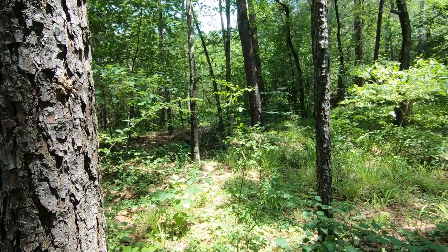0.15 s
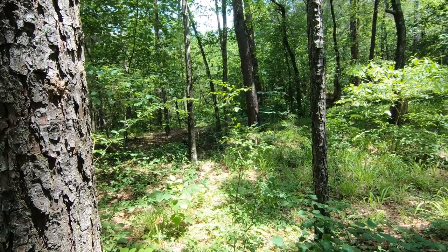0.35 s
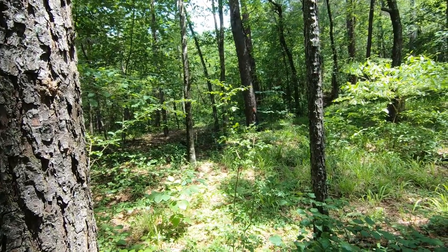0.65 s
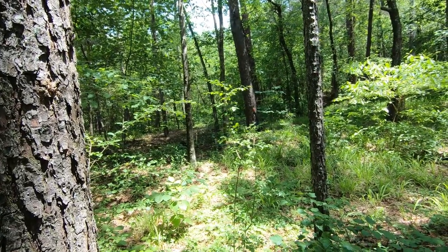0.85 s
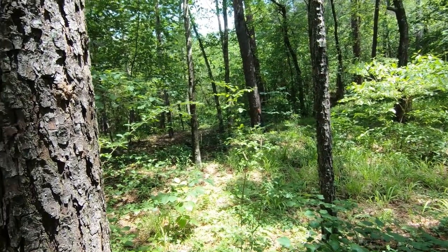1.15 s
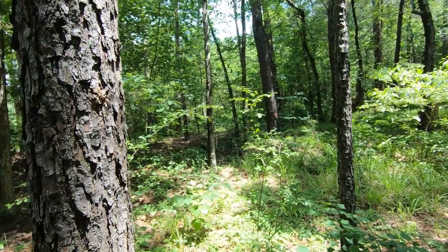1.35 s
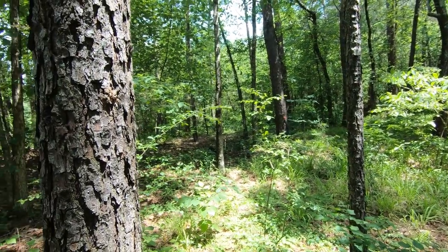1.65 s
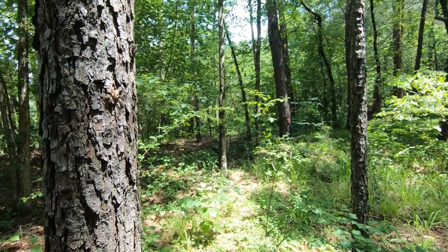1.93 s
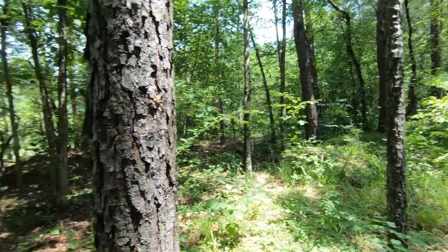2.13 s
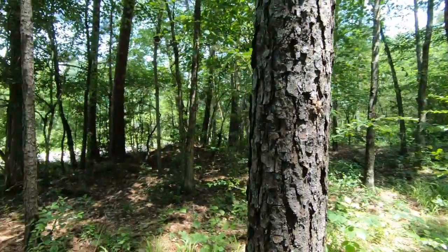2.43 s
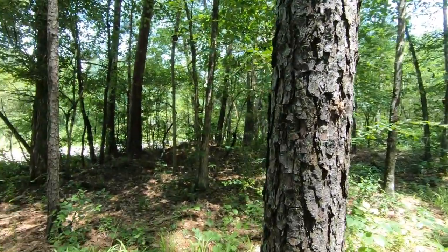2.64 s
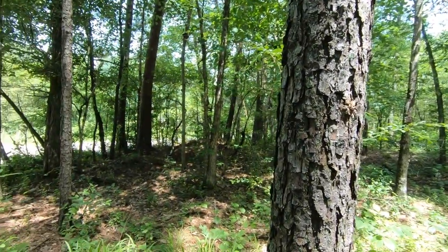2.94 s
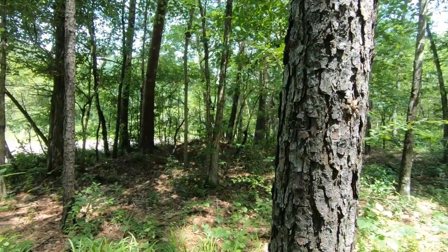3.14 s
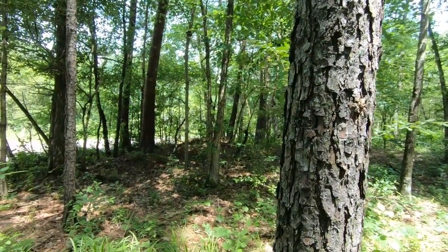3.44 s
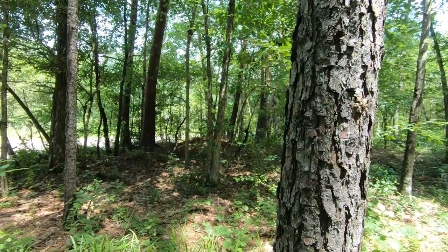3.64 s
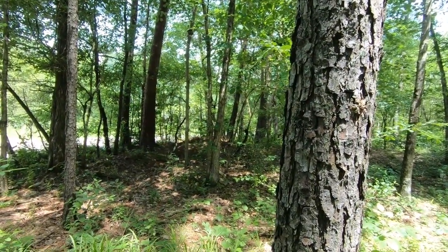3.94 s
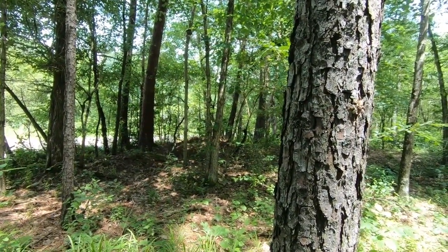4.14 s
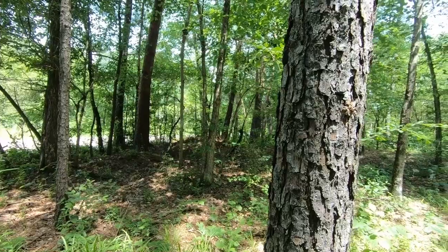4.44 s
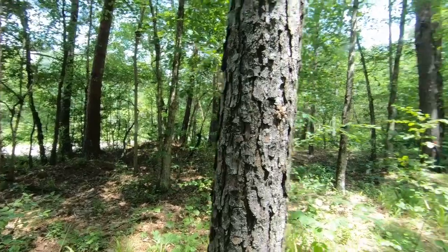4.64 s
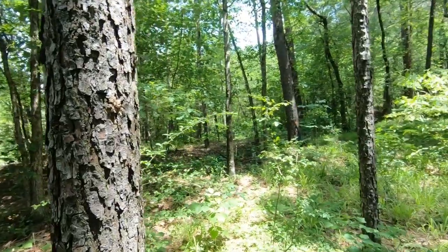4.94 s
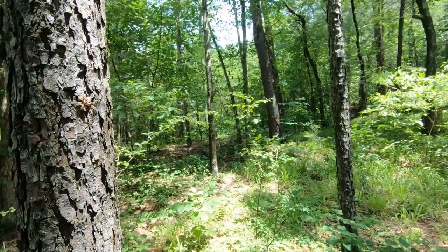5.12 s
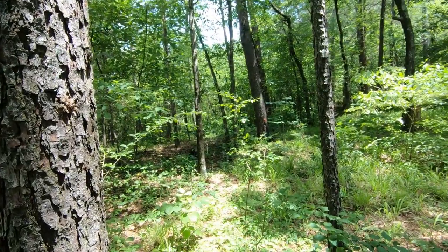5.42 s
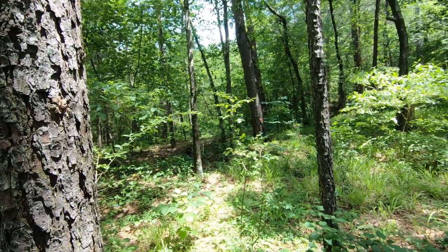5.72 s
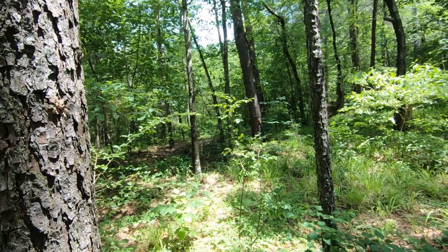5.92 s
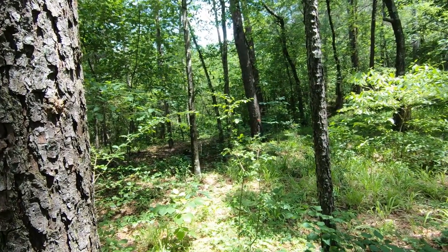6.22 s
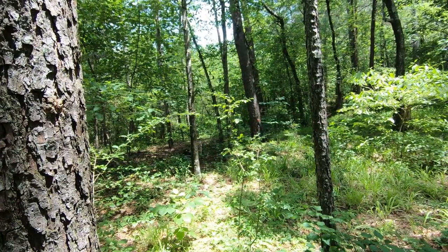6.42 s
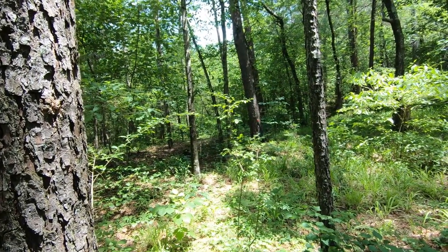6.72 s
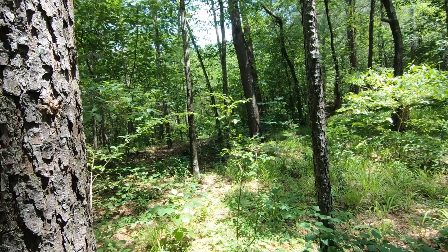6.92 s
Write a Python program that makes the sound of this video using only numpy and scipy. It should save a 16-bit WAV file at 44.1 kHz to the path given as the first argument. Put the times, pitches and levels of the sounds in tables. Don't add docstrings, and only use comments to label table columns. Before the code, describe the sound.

Dense woodland birdsong: short high whistles, quick slides and hoarse buzzes, softly echoed by trees over a hazy distant flock and faint machinery hum. Around one to two seconds cloth rubs against the hand-held microphone, then wind thumps heavily. More thumps and leaf brushing come near five seconds, followed by a nearer bird's rapid rising trill and a few lower, clear notes.

```python
import sys
import numpy as np
from scipy import signal
from scipy.fft import rfft, irfft, next_fast_len
from scipy.io import wavfile
from scipy.ndimage import uniform_filter1d

SR = 44100
rng = np.random.default_rng(int(sys.argv[2]) if len(sys.argv) > 2 else 0)


def makeup_ratio(level_db):
    decades = np.asarray(level_db, float) / 20
    return 10 ** decades


def wav_out(sig):
    wavfile.write(sys.argv[1], SR, np.round(np.clip(np.atleast_2d(sig).T, -1, 1) * 32767).astype(np.int16))


N = 311787
SIZE = next_fast_len(N + SR // 2, real=True)
TIME, FREQ = np.arange(N) / SR, np.arange(SIZE // 2 + 1) * SR / SIZE + 1e-3


def level(x, db):
    return x * makeup_ratio(db) / np.sqrt(np.mean(x ** 2))


def over_time(table, column=1):
    s, value = np.array(table).T[[0, column]]
    return np.interp(TIME, s, value)


def over_freq(table, column=1):
    hz, value = np.array(table).T[[0, column]]
    return np.interp(np.log(FREQ), np.log(hz), value)


def shade(table):
    inside = (FREQ > table[0][0]) * (FREQ < table[-1][0])
    return makeup_ratio(over_freq(table)) * inside


def walk(rate, size=N):
    at = np.arange(size) * rate / SR
    count = int(at[-1]) + 2
    return 1.2 * np.interp(at, np.arange(count), rng.standard_normal(count))


def bouts(table, rest_db, rise_db_s, fall_db_s):
    out = np.full(N, float(rest_db))
    for s, length, db in table:
        early = np.maximum(s - TIME, 0)
        late = np.maximum(TIME - s - length, 0)
        out = np.maximum(out, db - rise_db_s * early - fall_db_s * late)
    return out


# (frequency [Hz], left minus right [dB], likeness [0-1], left leads by [rad])
PORT_DIFFERENCES = [(57.3, 1.5, 0.7, 0.59), (203, 1, 0.25, 1.1), (374, -1.5, 0.44, 3.25),
                    (890, -1, 0.91, 2.92), (1370, 0, 0.54, 2.62), (1900, 0, 0.8, 2.27),
                    (2400, -0.3, 0, 0.6), (2900, -0.8, 0.95, 1), (4300, -4.5, 0.6, 0.058),
                    (5200, -10.5, 0.8, 0.5), (6500, -12, 0.19, 2.15), (7470, -7, 0.02, 1.9),
                    (7660, -1.7, 0, 1.9)]


def ports(shared, own=None):
    lean, like, lead = (over_freq(PORT_DIFFERENCES, column=k) for k in (1, 2, 3))
    right = np.exp(-1j * lead) * shared
    if own is not None:
        like = np.clip(like, 0, .95)
        right = like * right + np.sqrt(1 - like ** 2) * own
    return np.array([shared * makeup_ratio(lean / 2), right * makeup_ratio(-lean / 2)])


def hiss(gain, patchy_db, rate):
    both = ports(*rfft(rng.standard_normal((2, SIZE)))) * gain
    out, octave = 0, np.log2(FREQ)
    for centre in np.arange(5, 14.5):
        share = np.cos(np.pi / 2 * np.clip(octave - centre, -1, 1)) ** 2
        if np.max(gain * share) > .012 * gain.max():
            band = irfft((both * share).astype(np.complex64), SIZE)[:, :N]
            out = out + makeup_ratio(patchy_db * walk(rate)) * band
    return level(out, 0)


def add(track, s, x):
    i = int(s * SR)
    track[..., max(i, 0):i + x.shape[-1]] += x[..., max(-i, 0):N - i]


def whistle(hz, db, edge):
    size = len(hz)
    turns = np.cumsum(hz * (1 + .007 * walk(170, size=size))) / SR
    waver_db = 2.4 * walk(90, size=size)
    waver_db = waver_db - waver_db.mean()
    swell = signal.windows.tukey(size, edge)
    return np.sqrt(2) * makeup_ratio(db + waver_db) * swell * np.sin(2 * np.pi * turns)


def slur(length, start_hz, mid_hz, end_hz, db, skew=1):
    u = np.linspace(0, 1, int(length * SR)) ** skew
    curve = np.polyfit([0, .5, 1], [start_hz, mid_hz, end_hz], 2)
    return whistle(np.polyval(curve, u), db, edge=.17)


def slides(table, done):
    song = np.zeros(N)
    for s, length, start, end, db in table:
        add(song, s, slur(length, start, start + done * (end - start), end, db))
    return song


def flutter(row, swing_hz, rate, rough, gap):
    _, length, start_hz, end_hz, db = row
    size = int(length * SR)
    pace = np.mean(rate)
    turn = np.cumsum(rate * (1 + rough * walk(pace, size=size))) / SR % 1
    swing = 2 * turn - 1 if gap else np.sin(2 * np.pi * turn)
    swing = swing_hz * swing * (1 + rough * walk(pace, size=size))
    pulse = 1.73 * np.sin(np.pi * turn) ** 2 if gap else 1
    return whistle(np.linspace(start_hz, end_hz, size) + swing, db, edge=.24) * pulse


def puff(track, s, db, hz, width, pan_db, apart=0):
    t = np.arange(-2 * width, 2 * width, 1 / SR)
    phase = 2 * np.pi * hz * t * (1 - .0019 * t / width ** 2) + rng.uniform(0, 1, (2, 1))
    phase[1] += apart
    swing = -np.cos(phase) - .27 * np.cos(1.7 * phase)
    gain = makeup_ratio(db + 3.5 + np.array([[pan_db], [-pan_db]]) / 2)
    add(track, s - 2 * width, gain * swing * np.exp(-1.4 * (t / width) ** 2))


# (time [s], level [dB])
BREEZE_LEVEL = [(0, -59), (.5, -58.5), (1.2, -51.5), (1.8, -56), (2.3, -52), (2.8, -54), (3.3, -56.5),
                (4.0, -64.5), (4.9, -53), (5.5, -56), (6.2, -53.5), (7.07, -58)]


def breeze():
    low = signal.butter(2, (12, 45), "band", fs=SR, output="sos")
    rumble = level(signal.sosfilt(low, rng.standard_normal((2, N))), 2.3)
    return rumble * makeup_ratio(over_time(BREEZE_LEVEL) + 3.2 * walk(1.8))


# (frequency [Hz], level per Hz [dB])
DRONE_COLOUR = [(26, -36), (45, -6), (102, -16), (176, 1.5), (202, -4.5), (268, -14), (562, -25.5),
                (837, -15.5), (1030, -27.5), (1790, -29.5), (2770, -45), (3470, -35.5), (4200, -52.5),
                (5460, -70), (9240, -120)]


def drone():
    return hiss(shade(DRONE_COLOUR), patchy_db=.8, rate=6) * makeup_ratio(-52)


# (frequency [Hz], level [dB])
HUM_LINES = [(60, -62), (179.8, -56.5), (300, -75)]


def hum():
    turn = np.array([[0], [1.3]])
    out = 0
    for hz, db in HUM_LINES:
        waver = .6 * walk(6)
        out = out + makeup_ratio(db + 3 + 1.5 * walk(8)) * np.sin(2 * np.pi * hz * TIME + turn + waver)
    return out


# (frequency [Hz], level per Hz [dB])
FLOCK_COLOUR = [(4300, -33), (5000, -6.5), (5600, -5), (6450, 0), (6900, -5.5), (7800, -10), (8300, -39)]
# (time [s], level [dB])
FLOCK_LEVEL = [(0, -59.5), (.45, -68), (.6, -63.5), (1.05, -61), (1.6, -63.5), (2.36, -61.5), (2.6, -60.5),
               (3.1, -59), (3.55, -71), (3.9, -62), (4.6, -61.5), (5.4, -58), (5.55, -54.5), (6.15, -64),
               (6.4, -54), (6.55, -62), (6.72, -77), (7.07, -58.5)]


def far_flock():
    return hiss(shade(FLOCK_COLOUR), patchy_db=1.0, rate=20) * makeup_ratio(over_time(FLOCK_LEVEL))


def twitter(count):
    song, flock_db = np.zeros(N), over_time(FLOCK_LEVEL)
    for when, pitch, slide, length in rng.uniform(0, 1, (count, 4)):
        hz = 4400 * (1 + .6 * pitch)
        end = hz * (.8 + .3 * slide)
        db = flock_db[int(when * N)] - 12
        add(song, when * N / SR, slur(.015 + .04 * length, hz, (hz + end) / 2, end, db))
    return song


# (frequency [Hz], level per Hz [dB])
THRUSH_COLOUR = [(2500, -21), (3200, -8), (3700, -4), (4600, -4), (5200, -6.5), (5800, -29)]
# (time [s], length [s], level
# [dB])
THRUSH_BOUTS = [(.56, 0.3, -69.5), (1.1, .3, -61.5), (1.5, 0.68, -61.5), (2.5, 1.05, -64.5),
                (3.75, 0.72, -67.5), (4.9, .2, -66.5), (5.15, .3, -62.5), (5.53, .05, -56.5),
                (5.75, 0.54, -65.5), (6.38, 0.044, -60.5), (7.05, .1, -65)]


def far_thrushes():
    db = bouts(THRUSH_BOUTS, rest_db=-79, rise_db_s=58, fall_db_s=65)
    return hiss(shade(THRUSH_COLOUR), patchy_db=1.5, rate=15) * makeup_ratio(db)


# (frequency [Hz], level per Hz [dB])
LEAF_COLOUR = [(2000, -2.5), (4000, -6), (6500, 10), (7600, 4), (8300, -5), (10000, -12.5), (12500, -16),
               (14000, -24)]
# (time [s], length [s], level [dB])
HISS_SWELLS = [
    (1.05, 1.03, -79),
    (2.6, 0.043, -80),
    (4.6, 0.08, -75.5),
    (5.8, 0.11, -74),
    (6.4, 0.032, -76.5),
]


def leaves():
    db = bouts(HISS_SWELLS, rest_db=-85.5, rise_db_s=26, fall_db_s=21) + 17.5
    return hiss(shade(LEAF_COLOUR), patchy_db=2.0, rate=12) * makeup_ratio(db)


# (time [s], length [s], start [Hz], end [Hz],
# level [dB])
BURR_SONGS = [(0.037, 0.057, 5690, 5200, -61.5), (0.183, 0.19, 6370, 6180, -63),
              (.78, 0.086, 4690, 4310, -62), (1.641, 0.16, 6590, 5810, -54),
              (2.458, 0.18, 3000, 2685, -67.5), (2.67, 0.13, 2790, 2400, -66.5),
              (2.844, 0.12, 2900, 2714, -67.5), (2.838, 0.086, 5320, 5730, -63),
              (3.246, .19, 6366, 5800, -53.5), (3.699, 0.092, 6400, 5950, -62),
              (3.989, .08, 6500, 5900, -54), (4.251, 0.059, 5580, 4700, -62),
              (4.635, 0.052, 2100, 2214, -64), (4.81, .035, 2150, 1900, -57), (4.7, .07, 2500, 2600, -66),
              (3.725, .08, 3900, 3300, -70), (0.543, 0.048, 4200, 3800, -68),
              (2.88, 0.042, 3300, 3200, -66)]


def burrs():
    song = np.zeros(N)
    for row in BURR_SONGS:
        add(song, row[0], flutter(row, 480 + .085 * row[2], rate=170, rough=.5, gap=True))
    return song


# (time [s], length [s], pitch [Hz], level [dB])
HELD_NOTES = [(0.114, 0.11, 4650, -71.5), (0.234, 0.02, 6950, -60), (0.223, 0.076, 5650, -68),
              (.255, .03, 3850, -73), (0.624, .015, 7090, -60), (0.366, 0.012, 4510, -61),
              (0.436, 0.027, 4610, -65.5), (0.606, 0.047, 6330, -57), (0.824, 0.063, 6420, -62),
              (1.135, 0.063, 5480, -57), (1.323, .027, 6150, -61), (1.404, .076, 5400, -60),
              (1.741, 0.047, 3450, -57), (1.98, 0.034, 2520, -62.5), (2.741, 0.11, 6650, -54.5),
              (2.993, 0.058, 5430, -51.5), (3.237, 0.061, 5480, -57.5), (2.97, .09, 3720, -69),
              (3.2, 0.037, 3480, -65.5), (2.476, .03, 4310, -63), (3.701, .012, 6450, -49),
              (3.96, 0.013, 6500, -56), (3.995, .012, 6410, -52), (5.108, .04, 1310, -64),
              (3.532, 0.025, 3840, -56.5), (3.566, 0.043, 3470, -61), (3.638, 0.028, 4970, -66),
              (3.864, 0.027, 4975, -60), (4.147, .022, 4140, -61), (4.296, 0.097, 5820, -54),
              (4.494, 0.035, 5830, -57), (4.56, .045, 5830, -58), (4.748, 0.054, 5790, -57),
              (6.479, 0.033, 1883, -67)]


def held_whistles():
    song = np.zeros(N)
    for s, length, hz, db in HELD_NOTES:
        edge_hz = hz * (1 - .012)
        add(song, s, slur(length, edge_hz, hz, edge_hz, db))
    return song


# (time [s], length [s], start [Hz], end [Hz], level [dB])
HOOK_NOTES = [(0.178, 0.038, 7170, 5650, -58.5), (0.737, 0.029, 5000, 4850, -61),
              (0.89, 0.068, 6870, 6700, -53.5), (2.3, 0.035, 7540, 6500, -51),
              (2.433, 0.044, 3750, 4330, -62.5), (2.983, .029, 4780, 5400, -65),
              (3.116, 0.08, 3760, 3420, -65), (3.51, 0.016, 2240, 2680, -56),
              (3.688, .045, 7100, 6460, -54), (3.905, .024, 4460, 4300, -62),
              (3.984, 0.041, 7170, 5890, -56), (4.542, 0.03, 5600, 5320, -61),
              (3.385, .04, 3400, 2800, -58), (4.64, 0.09, 2320, 2560, -68), (4.748, .016, 5850, 5150, -55),
              (4.969, 0.035, 6170, 6740, -55), (6.36, 0.045, 1650, 1900, -58)]


def hooks():
    return slides(HOOK_NOTES, done=.9)


# (time [s], level [dB], width [s], left minus right [dB])
SLOW_GUSTS = [
    (.182, -47.5, .045, -14),
    (2.058, -44.5, 0.018, -8),
    (2.135, -35.5, .025, 0),
    (2.19, -39.5, .03, -4),
    (2.24, -31.5, 0.044, 2),
    (2.316, -31.5, 0.033, 2.5),
    (2.42, -48.5, 0.039, -9),
    (4.866, -41, 0.073, -11.5),
    (5.044, -41.5, 0.056, -10),
    (6.312, -44, 0.032, -3),
]


def heaves():
    out = np.zeros((2, N))
    for s, db, width, pan_db in SLOW_GUSTS:
        puff(out, s, db, 28 + .44 * (db + 44), width, pan_db)
    return out


# (time [s], length [s], start [Hz], end [Hz], level [dB])
FALL_NOTES = [(0.587, 0.0099, 4850, 4200, -58.5), (1.186, 0.023, 4570, 3970, -59.5),
              (1.464, .013, 4530, 3900, -55.5), (1.742, 0.033, 2640, 2360, -63),
              (2.032, 0.05, 7540, 5840, -50.5), (2.077, .015, 5320, 3820, -59.5),
              (2.574, 0.025, 6000, 4660, -56.5), (2.718, 0.02, 6050, 4670, -56),
              (2.988, .07, 3350, 2540, -62), (3.066, .02, 6420, 5480, -56), (2.349, 0.015, 4450, 3720, -65),
              (3.717, 0.027, 6540, 5500, -64), (3.658, .02, 4920, 4120, -64.5),
              (3.883, 0.014, 4950, 4320, -60), (0.374, .016, 4000, 2200, -72),
              (.597, 0.015, 4000, 2100, -70), (.816, .018, 4300, 2100, -69), (4.95, .04, 2850, 2550, -69),
              (5.372, 0.013, 5100, 4300, -59)]


def falls():
    return slides(FALL_NOTES, done=.48)


# (time [s], length [s], start [Hz], end [Hz], level [dB])
RISE_NOTES = [(0.551, 0.05, 5460, 5850, -60), (1.39, .016, 3800, 4500, -62), (2.607, .02, 7130, 7700, -62),
              (3.089, 0.019, 2380, 2860, -58.5), (3.846, 0.024, 4080, 4350, -61),
              (4.612, 0.075, 1700, 2000, -65), (5.302, .009, 5870, 7100, -59),
              (5.443, 0.009, 5900, 7300, -57), (2.185, .01, 6000, 7500, -58),
              (6.159, 0.015, 3020, 3280, -61), (6.48, 0.034, 2900, 3360, -61)]


def rises():
    return slides(RISE_NOTES, done=.48)


# (time [s], level [dB], width [s], left minus right [dB])
QUICK_GUSTS = [
    (0.607, -43, 0.0058, 11.5),
    (2.116, -35, 0.008, 3),
    (2.17, -37.5, 0.014, 2),
    (2.263, -40.5, 0.014, -14),
    (3.303, -32.5, 0.0075, 8.5),
    (4.625, -30.5, 0.018, 3),
    (4.855, -45, 0.01, 6),
    (4.884, -41.5, 0.0086, 10.5),
    (4.954, -40.5, 0.016, 9.5),
    (5.037, -32, 0.018, 5),
]


def thumps():
    out = np.zeros((2, N))
    for s, db, width, pan_db in QUICK_GUSTS:
        puff(out, s, db, 87, width, pan_db, apart=.8 * np.pi)
    return out


# (time [s], length [s], start [Hz], end [Hz], level [dB])
NEAR_NOTES = [(6.256, 0.0186, 3100, 2050, -57), (6.574, .023, 2900, 1950, -55),
              (4.685, 0.0995, 2190, 1990, -54.5), (2.175, .034, 4000, 4350, -57),
              (6.897, .017, 2950, 3300, -59), (5.074, .03, 2120, 1930, -60), (4.85, 0.056, 2110, 2040, -63),
              (5.125, 0.086, 1900, 2190, -56), (5.198, .065, 2190, 1900, -53),
              (4.857, .04, 4030, 4780, -59), (4.665, .045, 3750, 4680, -62), (.776, .044, 4050, 4560, -63)]


def near_slides():
    return slides(NEAR_NOTES, done=.48)


# (time [s], level [dB])
CLOTH_LEVEL = [
    (.9, -103),
    (.96, -61.5),
    (1.1, -58.5),
    (1.5, -58),
    (1.9, -56),
    (2.25, -57),
    (2.32, -70),
    (2.5, -88),
]
# (frequency [Hz], width [Hz], level [dB])
CLOTH_MODES = [(2000, 990, -8), (2965, 32, 2), (3330, 340, -3), (4500, 490, -4.5), (5370, 720, -7),
               (7170, 690, -3)]


def cloth():
    body = sum(makeup_ratio(db) / np.hypot(1, 2 * (FREQ - hz) / width) ** 2 for hz, width, db in CLOTH_MODES)
    return hiss(body, patchy_db=.8, rate=9) * makeup_ratio(over_time(CLOTH_LEVEL))


# (time [s], level [dB], pitch [Hz], width [s], left minus right [dB])
CREAKS = [
    (1.5, -59.5, 255, 0.053, -4),
]


def creak():
    out = np.zeros((2, N))
    for row in CREAKS:
        puff(out, *row)
    return out


# (frequency [Hz], level per Hz [dB])
BRUSH_COLOUR = [(290, -48), (500, -5), (735, 12.5), (1010, 4.5), (1850, 5.5), (2140, 4.5), (5000, -16.5),
                (6500, -61), (11000, -120)]
# (time [s], length [s], level [dB])
BRUSHES = [
    (2.05, 0.13, -63.5),
    (4.5, 0.22, -73.5),
    (4.9, 0.36, -62),
    (5.5, 0.055, -54),
    (5.65, 0.1, -64),
]


def brushed_leaves():
    db = bouts(BRUSHES, rest_db=-87.5, rise_db_s=151, fall_db_s=56)
    return hiss(shade(BRUSH_COLOUR), patchy_db=1.5, rate=40) * makeup_ratio(db)


# (time [s], length [s], start [Hz], end [Hz], level [dB])
PLUNGE_NOTES = [
    (3.421, .034, 2820, 2250, -56.5),
    (6.976, .026, 2400, 1870, -50.5),
]


def plunges():
    return slides(PLUNGE_NOTES, done=.2)


# (time [s], length [s], start [Hz], end [Hz], level [dB])
RATTLE_SONGS = [
    (4.157, .14, 6300, 6310, -56),
    (5.031, .04, 4850, 4700, -61),
    (5.068, .04, 4500, 4400, -64),
]


def rattles():
    song = np.zeros(N)
    for row in RATTLE_SONGS:
        slant = np.sign(row[3] - row[2])
        add(song, row[0], flutter(row, 800 * slant, rate=74, rough=.02, gap=True))
    return song


# (time [s], pitch [Hz])
CHIP_PITCH = [(0, 3950), (.006, 4450), (.015, 4680), (.027, 5400)]
# (time [s], level [dB])
TRILL_LEVEL = [
    (5.58, -66),
    (5.7, -61.5),
    (5.87, -62),
    (5.93, -56.5),
    (6.16, -56),
    (6.22, -62),
    (6.3, -59.5),
    (6.46, -62),
]


def trill():
    song = np.zeros(N)
    hz = np.interp(np.arange(0, CHIP_PITCH[-1][0], 1 / SR), *np.transpose(CHIP_PITCH))
    for k in range(16):
        s = 5.583 + .0553 * k + .00014 * k ** 2
        db = np.interp(s, *np.transpose(TRILL_LEVEL)) + .8 * rng.standard_normal()
        add(song, s, whistle(hz, db, edge=.4))
    return song


# (time [s], length [s], top [Hz], depth [share of the top], level [dB])
ARCH_NOTES = [
    (6.176, 0.062, 3095, .24, -56.5),
    (6.499, 0.056, 3010, 0.28, -53),
    (6.91, .042, 3120, 0.225, -54),
]


def arches():
    song, lean = np.zeros(N), .24
    skew = np.log(.5) / np.log(.58)
    for s, length, hz, depth, db in ARCH_NOTES:
        start, end = hz * (1 - depth * (1 - lean)), hz * (1 - depth * (1 + lean))
        add(song, s, slur(length, start, hz, end, db, skew=skew))
    return song


# (time [s], length [s], start [Hz], end [Hz], level [dB])
WARBLE_SONGS = [
    (6.669, .155, 3286, 2694, -53),
]


def warbles():
    song = np.zeros(N)
    for row in WARBLE_SONGS:
        size = int(row[1] * SR)
        swing_hz = 280 * np.linspace(1 - .45, 1 + .45, size)
        rate = np.linspace(135, 98, size)
        add(song, row[0], flutter(row, swing_hz, rate, rough=.1, gap=False))
    return song


# (frequency [Hz], echo minus direct [dB])
ECHO_SHARE = [(2000, -1), (3000, -0.5), (4500, -2.5), (5500, -1), (6500, 2.5)]


def among_trees(song, near):
    t = np.arange(SR) / SR
    leaf_t60_s, trunk_t60_s = .3, .9
    fade = np.exp(-np.log(1000) * t / leaf_t60_s) + makeup_ratio(-6) * np.exp(-np.log(1000) * t / trunk_t60_s)
    fade = fade * np.clip(t / .019, 0, 1)
    echo = level(rng.standard_normal((2, SR)) * fade, 0) / np.sqrt(SR)
    wet = makeup_ratio(over_freq(ECHO_SHARE))
    stirred = (song + makeup_ratio(-7) * near) * (.4 + .9 * walk(220))
    slap = makeup_ratio(-13) * np.roll(near, int(.036 * SR)) * (.7 + .7 * walk(120))
    wood = ports(*rfft(echo, SIZE))
    power = abs(wood.sum(0)) ** 2
    fine, broad = (uniform_filter1d(power, int(hz * SIZE / SR)) for hz in (70, 900))
    scattered = wet * rfft(stirred, SIZE) * wood * np.sqrt(broad / fine)
    heard = ports(rfft(song + near + slap, SIZE)) + scattered
    return irfft(heard / np.hypot(1, wet), SIZE)[:, :N]


def scene():
    song = twitter(count=70) + burrs() + held_whistles() + hooks() + falls() + rises() + rattles()
    near = near_slides() + plunges() + trill() + arches() + warbles()
    wind = breeze() + heaves() + thumps()
    handling = cloth() + creak() + brushed_leaves()
    distance = drone() + hum() + far_flock() + far_thrushes() + leaves()
    return among_trees(song, near) + wind + handling + distance


def top_cut(x):
    return signal.sosfilt(signal.butter(12, 13500, fs=SR, output="sos"), x)


def record(dry):
    band = signal.butter(2, (7000, 11000), "band", fs=SR, output="sos")
    own = signal.sosfilt(band, rng.standard_normal((2, N)))
    return top_cut(dry + level(own, -81))


dry = scene()
out = record(dry)
wav_out(out)
```